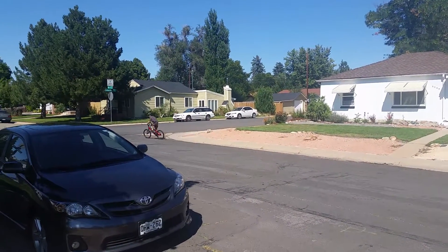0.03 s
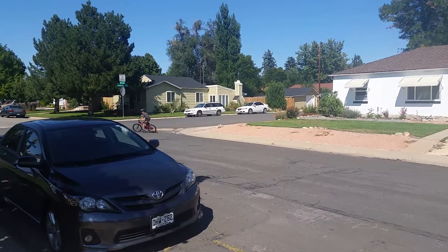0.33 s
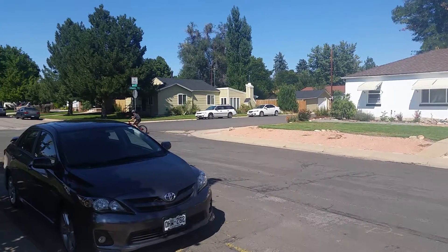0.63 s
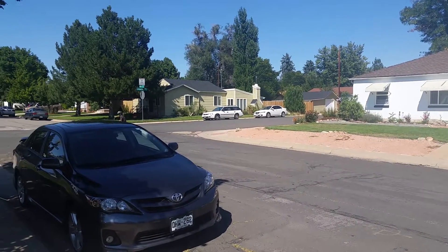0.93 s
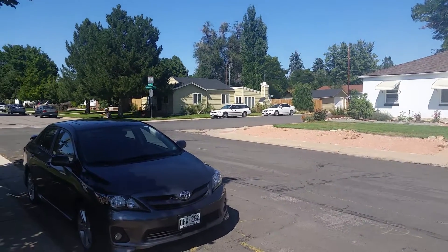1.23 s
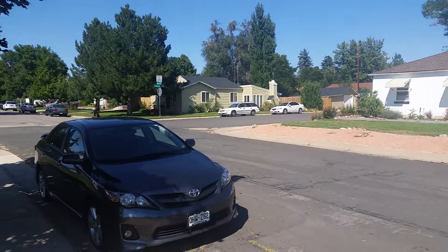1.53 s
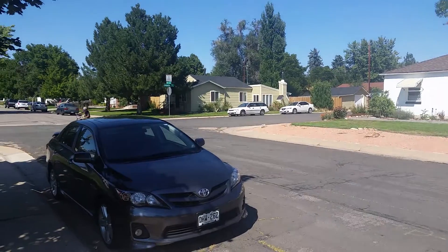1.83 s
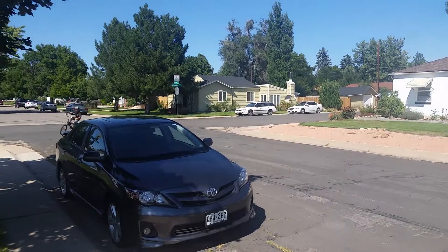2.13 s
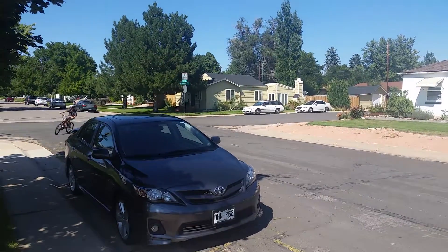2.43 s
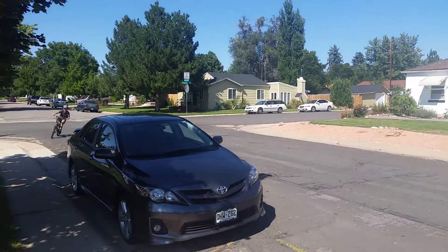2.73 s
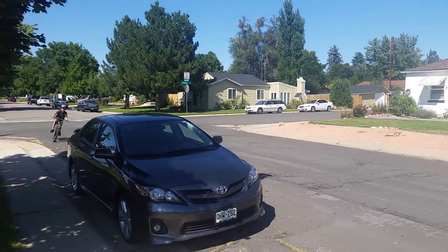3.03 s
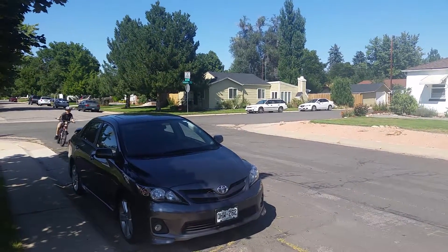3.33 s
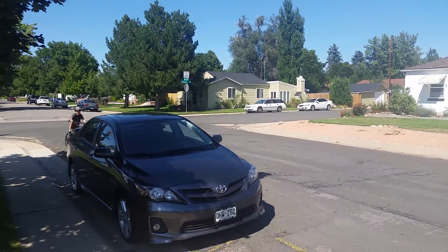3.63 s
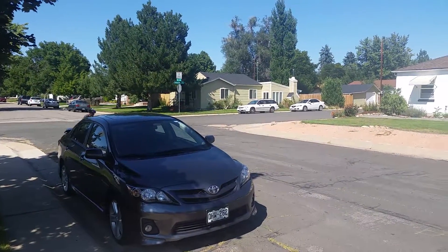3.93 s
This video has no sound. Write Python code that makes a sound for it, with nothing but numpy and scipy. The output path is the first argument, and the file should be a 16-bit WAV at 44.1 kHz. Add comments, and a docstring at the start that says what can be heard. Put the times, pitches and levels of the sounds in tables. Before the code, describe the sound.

Distant traffic rumbles steadily on a quiet residential street while a small engine, perhaps a mower, drones far away. Light wind bumps the microphone, a faint high hiss hangs on the left, and one sharp click comes before halfway.

```python
"""A small engine, perhaps a mower, drones far away on a quiet residential street in summer.
Its firing makes a low note with overtones, which fade in and out in the moving air.
Town traffic rumbles, distant machines hum, and a narrow high hiss hangs on the left.
Light wind bumps the two microphone openings. There are a few faint ticks
and one sharp click of the recorder."""
import sys
import numpy as np
from scipy import signal
from scipy.fft import rfft, irfft
from scipy.io import wavfile

SR = 44100
rng = np.random.default_rng(int(sys.argv[2]) if len(sys.argv) > 2 else 0)


def generate_wav(sig):
    """Save sig (samples, or channels by samples) to the path in sys.argv[1] as 16-bit PCM at SR."""
    pcm = np.round(np.clip(np.atleast_2d(sig).T, -1, 1) * 32767).astype(np.int16)
    wavfile.write(sys.argv[1], SR, pcm)


N = 176400
T = np.arange(N) / SR
FREQS_HZ = np.fft.rfftfreq(N, 1 / SR)

# how traffic, hiss and fizz rise and fall together: time_s, relative_db
SWELL = [(0, 2), (.4, 2.2), (1, 1.8), (1.35, 0), (1.6, -0.1), (1.8, -3), (2.05, -1.5), (2.35, 0.7),
         (2.7, 1.76), (3, 0.5), (3.33, 1.5), (3.45, -2.3), (3.6, -0.4), (3.72, -4.5), (4, -0.5)]


def engine():
    """The firing makes a note and its overtones; moving air makes each fade and waver by itself."""
    # firings per second: time_s, pitch_hz
    firing = [(0, 123.8), (.45, 123.5), (.75, 122.1), (1.1, 121.6), (1.6, 122.2), (2.1, 123), (2.7, 121.4),
              (3.3, 122.7), (4, 121.9)]
    # strength of the lowest note: time_s, relative_db
    base_levels = [(0.0, -43), (0.2, -38), (0.88, -41), (1.2, -55.5), (1.44, -42), (1.49, -63), (1.56, -51),
                   (1.71, -56), (2.14, -38), (2.29, -44.5), (2.71, -44), (2.9, -49.5), (3.34, -39),
                   (3.42, -63), (3.49, -45.5), (3.69, -53.5), (3.93, -42), (4.0, -61)]
    # strength of the overtone at twice that pitch: time_s, relative_db
    second_levels = [(0.0, -68), (0.13, -51), (0.44, -50.5), (0.66, -61), (1.44, -55), (1.73, -64.5),
                     (1.83, -52), (2.09, -75.5), (2.58, -55.5), (3.24, -61), (3.3, -48), (3.5, -69),
                     (3.55, -54.5), (4.0, -64.5)]
    # shared strength of the higher overtones: time_s, relative_db
    upper_levels = [(0, -67.5), (.17, -54), (.45, -55.5), (.9, -59), (1.35, -63.5), (1.6, -64),
                    (1.85, -69.5), (2.1, -67.5), (2.35, -59.5), (2.52, -63.5), (2.7, -59), (2.95, -63.5),
                    (3.3, -60.5), (3.45, -68.5), (4, -68)]
    # those higher overtones: pitch_multiple, offset_db
    upper_tones = [(3, -4), (4, -10.5), (5, -13), (6, -19.5)]
    fade_db, fade_hz, right_delay_s = 2.5, 6.8, 0.00022
    pitch_hz = curve(firing)[0]
    left_phase = 2 * np.pi * np.cumsum(pitch_hz) / SR
    phase = np.array([left_phase, left_phase - 2 * np.pi * pitch_hz * right_delay_s])
    base_db = curve(base_levels)[0] - 1 + 0.9 * drift(9.5)
    out = amp(base_db) * np.sin(phase + 0.28 * drift(fade_hz))
    overtones = [(2, curve(second_levels)[0] - .5)]
    overtones += [(round(multiple), curve(upper_levels)[0] + db) for multiple, db in upper_tones]
    for multiple, db in overtones:
        waver = rng.uniform(0, 2 * np.pi) + 0.36 * drift(fade_hz)
        out += amp(db + fade_db * drift(fade_hz)) * np.sin(multiple * phase + waver)
    return np.sqrt(2) * out * amp([[-.8], [.7]])  # a little louder on the right


def traffic():
    """Distant traffic rumbles, alike on both sides in the bass and a little later on the right."""
    # tone of the rumble: pitch_hz, relative_db
    tone = [(10, -21.5), (25, -11.5), (50, -3.5), (85, 3), (140, -1), (185, -3.5), (225, -10), (310, -16),
            (430, -18), (650, -19.5), (1000, -26), (1500, -36), (2400, -45.5), (4000, -50.5), (8000, -73.5)]
    # how the two sides compare: pitch_hz, likeness (0 to 1), left_minus_right_db
    sides = [(39, .8, 0), (132, 0.99, -2), (297, 0.82, 1.5), (660, 0.47, 1.7), (1280, 0, 4), (3020, 0, 2)]
    right_delay_s = .00007
    likeness, balance_db = by_hz(sides)
    shared, separate = white()
    delay = np.exp(-2j * np.pi * FREQS_HZ * right_delay_s)
    left = shared * amp(balance_db / 2)
    right = (likeness * delay * shared + np.sqrt(1 - likeness ** 2) * separate) * amp(-balance_db / 2)
    rumble = unit(irfft(np.array([left, right]) * amp(by_hz(tone)), N))
    return rumble * amp(-47.5 + 0.94 * curve(SWELL) + .5 * drift(21))


def wind():
    """A weak breeze blows, and swirls of air each bump one microphone opening with a low puff."""
    # strength of the breeze: time_s, left_db, right_db
    breeze_levels = [(0, -47.5, -50.5), (.85, -51, -49.5), (1.1, -54, -55), (1.55, -44, -58),
                     (1.78, -60.5, -66.5), (2.1, -48, -53), (2.5, -47.5, -61.5), (3.05, -52.5, -53.5),
                     (3.3, -58, -65.5), (4, -69.5, -66)]
    # tone of the breeze: pitch_hz, relative_db
    breeze_tone = [(8, -21), (25, 3.5), (50, 1.5), (100, -3.5), (180, -13), (400, -34), (1500, -76.5)]
    # the puffs: peak_s, half_width_s, level_db, pitch_hz, side (0 left, 1 right)
    bumps = [(0.034, 0.03, -45, 49.7, 1), (0.243, 0.023, -38, 64.4, 1), (0.322, 0.037, -42.5, 75, 0),
             (0.416, 0.044, -43, 85, 1), (0.58, 0.017, -38, 60, 1), (.76, 0.021, -38.5, 45.2, 0),
             (.88, 0.019, -38.5, 69.6, 1), (0.97, .025, -36.5, 55, 0), (1.034, 0.022, -35, 60.3, 0),
             (1.268, 0.02, -36, 66.4, 0), (1.365, 0.033, -40, 107, 0), (1.415, .045, -35, 108, 0),
             (1.608, 0.03, -34.5, 79, 0), (2.376, 0.063, -39, 44.6, 0), (2.765, .04, -40, 48, 0)]
    spread_octaves = 0.62
    out = noise(breeze_tone) * amp(curve(breeze_levels))
    for peak_s, half_width_s, level_db, pitch_hz, side in bumps:
        shape = np.exp(-((T - peak_s) / half_width_s) ** 2)
        band = np.exp(-.5 * (np.log2((FREQS_HZ + 1) / pitch_hz) / spread_octaves) ** 2)
        puff = shape * irfft(rfft(rng.standard_normal(N)) * band, N)
        out[round(side)] += amp(level_db) * puff * np.sqrt(np.sum(shape ** 2) / np.sum(puff ** 2))
    return out


def hums():
    """Other distant machines give wavering hums, and a faint whine comes and goes."""
    # the low hums: pitch_hz, level_db
    low_hums = [(171, -60.5), (184, -63.5)]
    # strength of the whine: time_s, level_db
    whine_levels = [(0, -76), (1.8, -76.5), (2.25, -62), (2.55, -68), (2.9, -74), (3.3, -68), (3.6, -74),
                    (4, -69)]
    whine_hz = 522.7
    tones = list(low_hums) + [(whine_hz, curve(whine_levels)[0])]
    return sum(amp(db + 2.5 * drift(4)) * np.sin(2 * np.pi * hz * T + .8 * drift(3.6))
               for hz, db in tones)


def hiss():
    """A narrow band of high noise flickers slightly, mostly on the left."""
    # tone of the hiss: pitch_hz, left_relative_db, right_relative_db
    tone = [(2000, -32.5, -36.5), (2810, -25, -27), (3220, -16, -25.5), (3600, -14, -19), (3906, 0, -19),
            (4110, -3.5, -20.5), (4510, 1.5, -13.5), (4760, -3, -21), (5190, -10.5, -25.5),
            (5800, -20.5, -31.5), (6370, -25.5, -34.5), (7400, -45.5, -55.5), (9000, -62, -63.5)]
    return noise(tone) * amp(-66 + curve(SWELL) + 0.48 * drift(38))


def ticks():
    """Tiny bursts of high noise make faint ticks on the left."""
    # the ticks: start_s, level_db
    bursts = [(.925, -60), (2.178, -56), (3.458, -61)]
    # tone of a tick: pitch_hz, relative_db
    tone = [(2000, -35.5), (3300, -8), (4500, 9.5), (5500, -5), (6500, -11), (7500, -28), (10000, -49)]
    decay_s, right_db = 0.0065, -15
    shape = sum(amp(db) * (T >= start_s) * np.exp(-abs(T - start_s) / decay_s) for start_s, db in bursts)
    spectrum = rfft(shape * rng.standard_normal(N)) * unit(amp(by_hz(tone)[0]))
    return irfft(spectrum, N) * amp([[0], [right_db]])


def fizz():
    """Fine, very high noise swells and sinks above the hiss."""
    # tone of the fizz: pitch_hz, relative_db
    tone = [(3000, -27), (9500, -22.5), (10500, -10.5), (12000, -0.5), (13500, 0), (15600, 3.5)]
    return noise(tone) * amp(-76.5 + 1.3 * curve(SWELL))


def microphone_noise():
    """The microphone's electronics add a very faint, steady noise."""
    return amp(-90.5) * rng.standard_normal((2, N))


def recorder_click():
    """The signal jumps in one step and swings back to rest."""
    start_s, decay_s, pitch_hz = 1.4233, 0.0018, 148
    left_db, right_db = -27, -35.5
    age_s = np.maximum(T - start_s, 0)
    swing = (T >= start_s) * np.exp(-age_s / decay_s) * np.cos(2 * np.pi * pitch_hz * age_s)
    return -swing * amp([[left_db], [right_db]])


def amp(db):
    """Turns decibels into a number to multiply by."""
    return 10 ** (np.asarray(db) / 20)


def unit(x):
    """Scales a signal to an average strength (rms) of 1."""
    return x / np.sqrt(np.mean(x ** 2) + 1e-30)


def curve(table):
    """Fills in a time table's columns for every sample."""
    times_s, *columns = np.transpose(table)
    return np.array([np.interp(T, times_s, column) for column in columns])


def by_hz(table):
    """Fills in a pitch table's columns for every frequency."""
    hz, *columns = np.transpose(table)
    return np.array([np.interp(np.log(FREQS_HZ + 1), np.log(hz + 1), column) for column in columns])


def white():
    """Two unrelated white noises, split into their frequencies."""
    return rfft(rng.standard_normal((2, N)))


def noise(tone):
    """Unrelated left and right noises with the given tone."""
    return unit(irfft(white() * amp(by_hz(tone)), N))


def drift(rate_hz):
    """A random wobble of strength 1, mostly slower than rate_hz."""
    slow_band = (FREQS_HZ > 0) * np.exp(-(FREQS_HZ / rate_hz) ** 2)
    return unit(irfft(rfft(rng.standard_normal(N)) * slow_band, N))


def scene():
    """Adds up the sounds of the street, left and right."""
    return engine() + hums() + traffic() + hiss() + fizz() + microphone_noise() + wind() + ticks()


def record(dry):
    """The recorder clicks once and cuts off the highest treble."""
    cutoff_hz = 15760
    treble_cut = signal.firwin(511, cutoff_hz, window=("kaiser", 9), fs=SR)
    return signal.oaconvolve(dry + recorder_click(), treble_cut[None], "same")


dry = scene()
out = record(dry)
generate_wav(out)
```